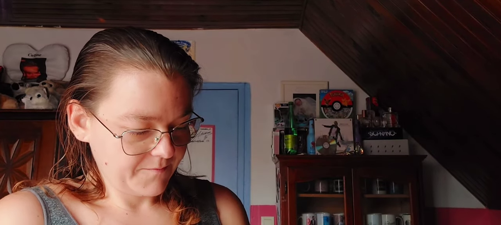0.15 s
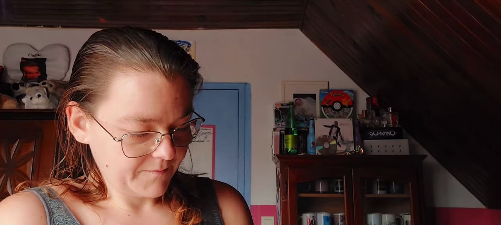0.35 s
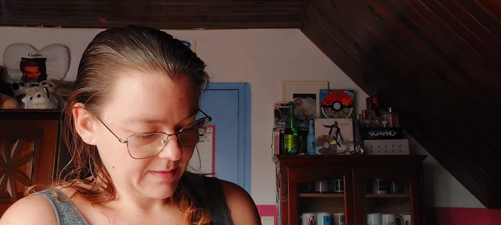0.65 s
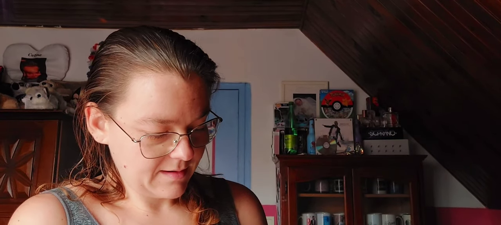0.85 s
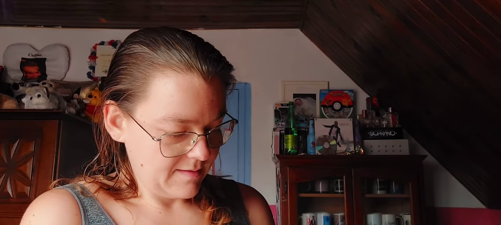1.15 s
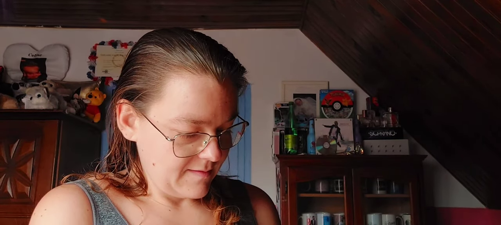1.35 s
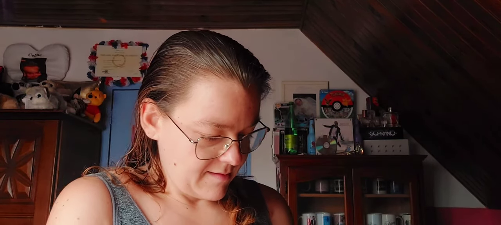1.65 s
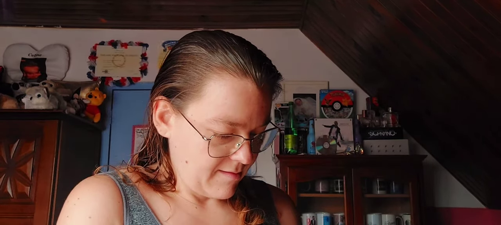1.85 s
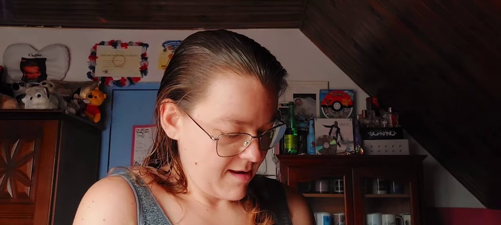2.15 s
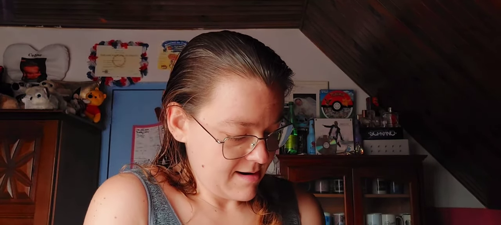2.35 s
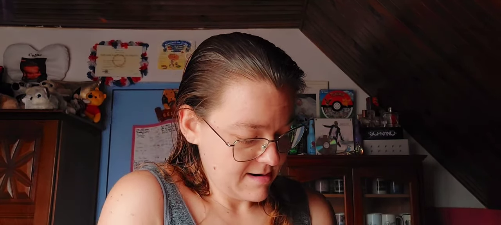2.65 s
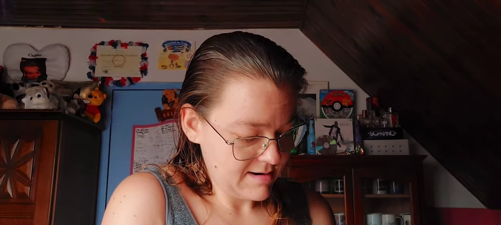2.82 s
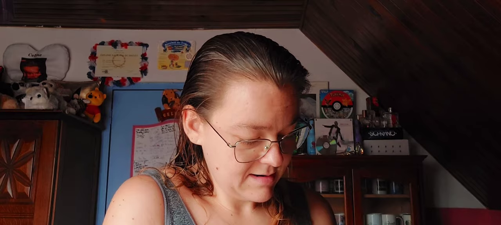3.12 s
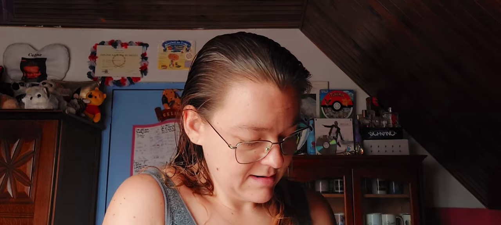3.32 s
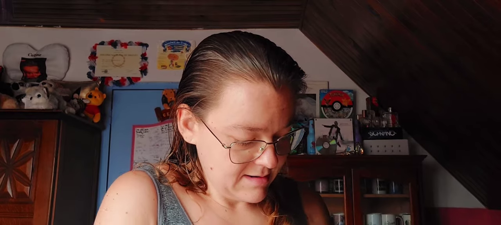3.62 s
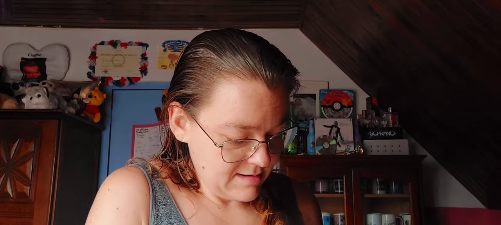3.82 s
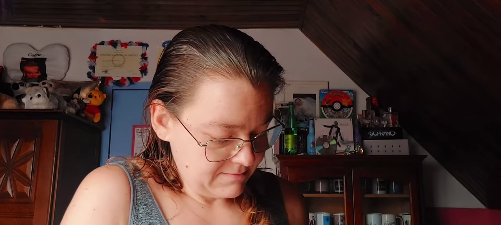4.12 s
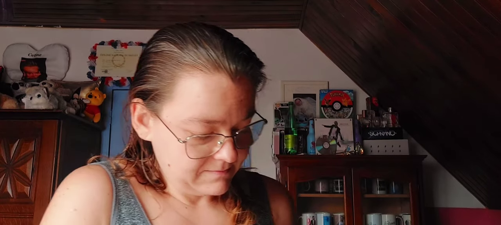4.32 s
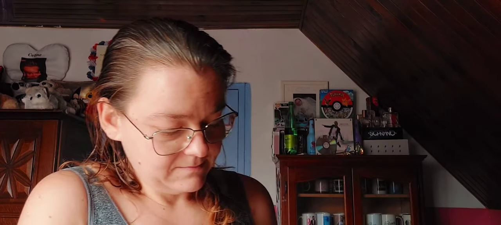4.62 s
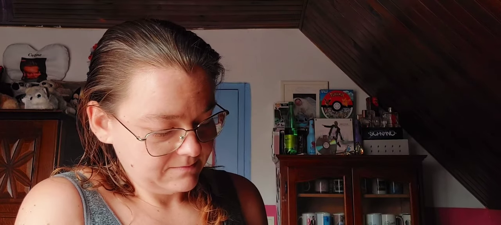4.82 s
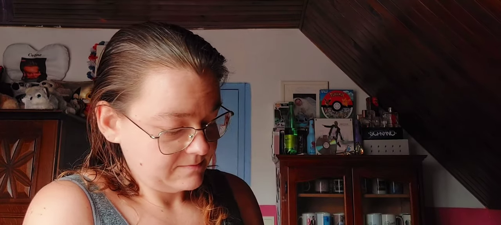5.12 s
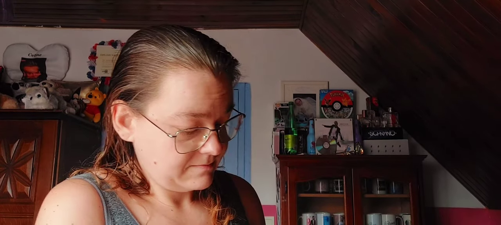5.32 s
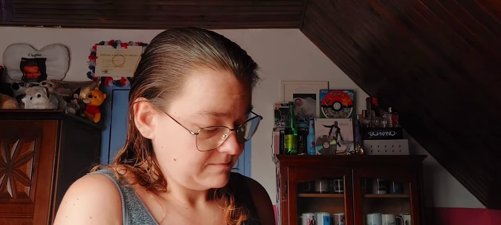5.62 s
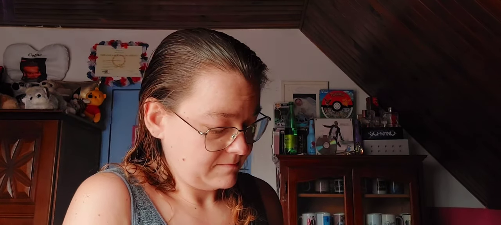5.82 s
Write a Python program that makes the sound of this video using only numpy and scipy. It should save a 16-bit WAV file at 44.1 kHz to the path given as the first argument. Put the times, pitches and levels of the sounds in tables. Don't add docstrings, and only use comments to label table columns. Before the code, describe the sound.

Hands unwrap stiff paper and plastic film close up indoors, rustling and crackling in bursts, with one very sharp loud crack past four seconds.

```python
import sys
import numpy as np
from scipy import signal
from scipy.fft import rfft, irfft, next_fast_len
from scipy.io import wavfile
from scipy.ndimage import map_coordinates

SR = 44100
rng = np.random.default_rng(int(sys.argv[2]) if len(sys.argv) > 2 else 0)


def digitize_waveform(pressure):
    field = np.atleast_2d(pressure).T
    bounded = np.clip(field, -1, 1)
    quanta = np.round(bounded * 32767).astype(np.int16)
    wavfile.write(sys.argv[1], SR, quanta)


def boost(x):
    u = np.asarray(x, float) / 20
    return 10 ** u


N = 263277

# frequency in Hz, density in dB per Hz.
HISS = [(18, -59), (30, -4), (88, 1), (624, -34), (1440, -22), (1870, -28.5), (2310, -16), (3420, -24.5),
        (15600, -19.5)]
# start in seconds, end in seconds, frequency in Hz, level in dB.
HUM = (1.57, 1.85, 436, -70)
# time in seconds, hold in seconds, paper rustle in dB, film crackle in dB.
SQUEEZES = [(0.1, .02, -68, -66), (0.293, 0.0075, -60, -74), (0.472, 0.12, -46, -50.5),
            (0.697, 0.013, -36, -43), (0.866, 0.089, -54.5, -69), (1.039, 0.013, -56, -56.5),
            (1.2, 0.03, -53.5, -59), (1.33, 0.0091, -45, -52), (1.43, 0.26, -52.5, -60.5),
            (1.845, 0.055, -53.5, -52), (2.052, 0.09, -53.5, -64.5), (2.204, 0.076, -52, -65),
            (2.444, 0.16, -49, -53.5), (2.624, 0.02, -62, -76), (2.776, 0.0059, -46, -45),
            (2.85, .08, -48, -54.5), (3.089, 0.017, -49, -56.5), (3.272, .01, -57.5, -61),
            (3.33, 0.077, -58, -61), (3.526, .01, -40.5, -50.5), (3.668, 0.087, -50, -54),
            (3.837, 0.0091, -47, -49.5), (4.114, .2, -51, -51.5), (4.394, 0.11, -44.5, -51.5),
            (4.57, .1, -54.5, -71), (4.728, 0.18, -50, -57), (4.986, 0.019, -55, -56),
            (5.213, 0.074, -48, -51.5), (5.603, 0.26, -75.5, -71)]
# time in seconds, rumble in dB.
PRESS = [(0.0, -72), (0.42, -76.5), (0.54, -48.5), (0.73, -66.5), (0.9, -69), (1.36, -62.5), (2.0, -67.5),
         (2.72, -73), (2.92, -50), (3.02, -78), (3.54, -56), (4.0, -72.5), (4.14, -56.5), (4.75, -58.5),
         (5.14, -70), (5.29, -49.5), (5.42, -74.5), (5.97, -75.5)]
# frequency in Hz, density in dB per Hz.
RUMBLE = [(25, -26.5), (60, -18), (127, 1.5), (180, -8.5), (240, -4), (350, -5.5), (480, -12.5), (700, -26)]
# frequency in Hz, width in Hz, level in dB.
PARCEL = [(625, 134, -2), (1100, 380, -1), (1450, 278, 1), (2337, 540, -1), (3270, 214, -14.5)]
# frequency in Hz, density in dB per Hz.
FILM = [(1500, -24), (3000, 3), (4000, -1), (6000, 0), (7600, -1.5), (9700, -7.5), (12300, -1.5),
        (15600, -7)]
# time in seconds, peak in dB, panel frequency in Hz.
CRIMPS = [(0.0082, -43, 2100), (0.1002, -45.5, 1100), (0.3074, -44, 1450), (0.4854, -25.5, 1510),
          (0.5325, -27, 2270), (5.5968, -49.5, 2310), (1.3292, -31, 1440), (1.3659, -32, 2290),
          (1.529, -39, 2150), (1.5962, -38.5, 2090), (2.0827, -38, 2570), (2.5364, -28, 2770),
          (2.5872, -28, 2600), (2.6422, -35, 1500), (2.8785, -31, 740), (2.9131, -30.5, 697),
          (3.4997, -32.5, 1310), (3.7155, -36, 1410), (3.832, -34, 1300), (4.1069, -16, 2160),
          (4.1108, -17, 2240), (4.1665, -28.5, 1450), (4.2333, -33, 860), (4.2663, -39.5, 1000),
          (4.758, -33.5, 2230), (4.8301, -32.5, 1310), (4.9709, -41.5, 2380), (5.073, -34.5, 2530),
          (5.2444, -30, 2560)]
# time in seconds, peak in dB.
FILM_TICKS = [(0.292, -47.5), (0.0767, -46), (0.2395, -44), (0.3805, -45.5), (0.412, -39.5), (0.5748, -27),
              (0.685, -39), (0.7225, -31.5), (1.15, -43), (1.206, -41), (1.868, -35.5), (1.91, -34),
              (1.944, -38), (1.99, -46), (2.156, -46), (2.3834, -41.5), (2.448, -44), (2.699, -47),
              (3.2763, -41.5), (3.4014, -38), (3.736, -35.5), (3.976, -43), (4.035, -39), (4.1335, -20),
              (4.378, -32), (4.5078, -38), (4.532, -39.5), (4.665, -42.5), (5.214, -31.5), (5.281, -35),
              (5.3225, -46),
    (5.468, -39.5),
    (5.5473, -72),
    (5.57, -44.5),
    (5.6871, -47),
    (5.7155, -47),
    (5.7393, -40.5),
    (5.8061, -46),
    (5.906, -57),
    (5.9533, -49),
]
# time in seconds, peak in dB, panel frequency in Hz.
FOLDS = [(0.4535, -36.5, 970), (0.48, -43.5, 1030), (0.8951, -32.5, 1006), (1.075, -35, 950),
         (1.615, -37, 1100), (2.74, -38, 1020), (1.6542, -38.5, 1100), (2.4831, -21.5, 2310),
         (2.5031, -32, 1470), (2.619, -37, 1670), (2.8224, -36.5, 1750), (2.893, -31, 1450),
         (2.9436, -29.5, 1140), (3.0292, -38.5, 1530), (3.1141, -26, 2780), (3.1251, -39.5, 2200),
         (3.4764, -29, 1350), (3.5445, -29.5, 960), (4.0064, -37.5, 1430), (4.131, -19, 1230),
         (4.1872, -31.5, 1617), (4.3023, -38, 1210), (4.3979, -32.5, 760), (4.4096, -30, 1430),
         (4.4208, -40, 2260), (4.4412, -30, 2270), (4.8654, -35.5, 1620), (5.2267, -25.5, 1470),
         (5.2865, -38, 2180)]
# time in seconds, peak in dB, panel frequency in Hz, tick in dB, left-right in dB.
SNAPS = [(0.4934, -21, 1085, -2.5, 0), (0.5838, -18.5, 2070, -8.5, -1), (0.6255, -25.5, 2160, -3.5, -1),
         (0.7622, -19, 2310, -6.5, -1), (1.0473, -24, 1520, -1.5, 3), (1.3152, -25.5, 1580, 3.5, 7.5),
         (1.8006, -26.5, 2460, -4, 2.5), (2.0268, -25, 1585, 3.5, 0), (2.0627, -23.5, 1760, -6, -2),
         (2.2251, -23, 2690, -7.5, 2.5), (2.488, -19, 1480, -14, 5.5), (2.7702, -20.5, 1620, -23, 8.5),
         (2.7853, -18, 1680, -2.5, 2), (2.9025, -19.5, 1060, -32.5, -4), (3.0671, -23.5, 1100, -14.5, 5),
         (3.5188, -14, 2050, -7, 2), (3.6366, -19.5, 1530, -10.5, 0.5), (3.861, -25.5, 1340, -4.5, 1.5),
         (4.0997, -10.5, 3030, -1.5, 3), (4.1245, -6, 1253, -13, 6), (4.134, -13.5, 1550, -17.5, 6),
         (4.358, -25, 1215, -9, 5.5), (4.8863, -19, 1990, -12, 0.5), (5.1876, -28, 1145, 0, 0.5)]
# time in seconds, peak in dB.
RATCHET = [
    (0.6886, -18),
    (.693, -18),
    (0.6961, -27),
    (0.7014, -19),
    (0.7079, -22),
    (0.711, -18.5),
    (0.718, -16.5),
    (0.7269, -16.5),
    (0.7311, -20.5),
]
# frequency in Hz, t60 in seconds.
ATTIC_DECAY = [(150, 0.31), (600, 0.2), (1500, 0.17), (4000, 0.17), (12000, 0.24)]
# frequency in Hz, level in dB.
WALLS = [(150, 14), (1500, -3.5), (4000, 0.5), (12000, -4.5)]
# time in seconds, peak in dB.
THUDS = [(0.521, -53), (0.619, -44), (1.052, -44.5), (1.326, -42.5), (1.611, -57), (1.804, -56),
         (2.496, -45), (2.62, -53), (2.794, -44), (2.895, -44), (3.07, -40.5), (3.515, -41), (3.633, -39),
         (3.856, -49), (4.094, -32), (4.116, -22.5), (4.225, -42), (4.354, -46), (5.219, -48)]
# frequency in Hz, level in dB, t60 in seconds.
TABLE_MODES = [(62, -22.5, 0.26), (124, -3.5, .09), (230, -4.5, 0.068), (319, -4.5, 0.053)]
# start in seconds, end in seconds, frequency in Hz, width in Hz, level in dB.
RUB = (2.04, 2.46, 680, 200, -60)

HISS_DB = -61.5
GRIP_DB_S, LET_GO_DB_S = 298, 149
REST_DB = (-74.5, -79)
LEAD_S = 0.005
RATCHET_HZ, RATCHET_TICK_DB = 1030, -22
FOLD_TICK_DB, CRIMP_TICK_DB = -12, -1.5
LEFT_DB, SCATTER_DB = 2.5, 3
RIGHT_LAG = 5
TOP_HZ = 15850


def unit(x):
    return x / np.sqrt(np.mean(x ** 2) + 1e-20)


def peak_one(x):
    return x / np.abs(x).max(axis=-1, keepdims=True)


def along(points, hz):
    f, value = np.transpose(points)
    return np.interp(np.log(hz + 1), np.log(f + 1), value)


def wobble(rate):
    knots = rng.standard_normal(int(N * rate / SR) + 4)
    return map_coordinates(knots, [np.arange(N) * rate / SR])


def fade(start, end):
    t = np.arange(N) / SR
    return np.clip(np.minimum(t - start, end - t) / 0.072, 0, 1)


def filtered(x, response):
    m = next_fast_len(x.shape[-1] + 4096)
    spectrum = rfft(x, m) * response(np.fft.rfftfreq(m, 1 / SR))
    return irfft(spectrum, m)[..., :x.shape[-1]]


def add(out, s, sound, pan_db=0):
    sides = boost(np.array([[pan_db / 2], [-pan_db / 2]]))
    out[:, round(s * SR):][:, :sound.shape[-1]] += sides * sound


def decay(t, t60):
    return boost(-60 * t / t60)


def hollow(f):
    small = (1j * f / (1j * f + 520)) ** 2
    total = 0
    for k, (center, width, db) in enumerate(PARCEL):
        mode = 1j * f * width / (center * center - f * f + 1j * f * width)
        total = total + (-1) ** k * boost(db) * mode
    return small * total


def film(f):
    return boost(along(FILM, f))


def hiss_and_hum():
    hiss = unit(filtered(rng.standard_normal((2, N)), lambda f: boost(along(HISS, f))))
    drone = filtered(hiss, lambda f: 1 / (1 + (f / 400) ** 4))
    breath = boost(5.4 * wobble(15) - 3.5)
    start, end, hz, db = HUM
    pipe = boost(db) * fade(start, end) * np.sin(2 * np.pi * hz * np.arange(N) / SR)
    return boost(HISS_DB - 2.5) * (drone + breath * (hiss - drone)) + pipe


def grains(per_second, spread_db, clump_db, life):
    slip_db = spread_db * np.minimum(rng.exponential(1, N), 4.2) + clump_db * wobble(35)
    slips = (rng.random(N) < per_second / SR) * boost(slip_db)
    puff = np.abs(signal.lfilter([1], [1, -np.exp(-1 / (life * SR))], slips))
    shared, own = rng.standard_normal(N), rng.standard_normal((2, N))
    return puff * (shared + 1.32 * own)


def effort():
    t = np.arange(0, N / SR + .01, .002)
    power = boost(np.array(REST_DB)[:, None]) ** 2
    for s, hold, *db in SQUEEZES:
        down_db = GRIP_DB_S * np.maximum(s - t, 0) + LET_GO_DB_S * np.maximum(t - s - hold, 0)
        power = power + boost(np.array(db)[:, None] - down_db) ** 2
    return [np.interp(np.arange(N) / SR, t, 10 * np.log10(p)) for p in power]


def handling():
    paper_db, film_db = effort()
    rustle = grains(700, spread_db=3.0, clump_db=3.0, life=0.0038)
    paper = unit(filtered(rustle, lambda f: hollow(f) / (1 + 0.99 * (f / 2900) ** 6)))
    crackle = unit(filtered(grains(1100, spread_db=3.5, clump_db=3.5, life=.0005), film))
    low = rng.standard_normal(N) + 0.95 * rng.standard_normal((2, N))
    rumble = unit(boost(3.5 * wobble(4.2)) * filtered(low, lambda f: boost(along(RUMBLE, f))))
    rumble_db = np.interp(np.arange(N) / SR, *np.transpose(PRESS)) + [[1.5], [-1.5]]
    return boost(paper_db + 0.5) * paper + boost(film_db + 2.0) * crackle + boost(rumble_db) * rumble


def all_creases():
    small = [(s, db, RATCHET_HZ, RATCHET_TICK_DB) for s, db in RATCHET]
    small += [(*row, FOLD_TICK_DB) for row in FOLDS]
    small += [(*row, CRIMP_TICK_DB) for row in CRIMPS]
    chances = rng.standard_normal(len(small))
    return SNAPS + [(*row, LEFT_DB + SCATTER_DB * chance) for row, chance in zip(small, chances)]


def creaking(starts, t):
    gaps = np.where(starts[:, None] > starts, starts[:, None] - starts, 1)
    rest = np.min(gaps, axis=1)[:, None, None]
    level_db = -4.5 - 25 * np.clip(rest / 0.086, 0, 1) + rng.normal(0, 1.8, rest.shape)
    return boost(level_db - 60 * np.abs(t) / 0.022)


def snaps():
    out, t = np.zeros((2, N + SR)), np.arange(SR // 20) / SR - LEAD_S
    after = np.maximum(t, 0)
    creases, lone = all_creases(), FILM_TICKS
    count = len(creases) + len(lone)
    noise = rng.standard_normal((count, 3, len(t)))
    strain = creaking(np.array([row[0] for row in creases + lone]), t)
    slow = boost(rng.normal(0, 1.0, (count, 1, 1)))
    give = 1 - np.exp(-after / 0.00042)
    tear = 1 - np.exp(-(after / 0.001) ** 2)

    def ports(unlike):
        return noise[:, :1] + unlike * noise[:, 1:]

    pitch = np.array([row[2] for row in creases] + [1500] * len(lone))[:, None, None]
    edge = np.array([1500] * len(creases) + [5000] * len(lone))[:, None, None]
    shine = rng.uniform(1800, 14000, (count, 1, 1))

    def near_panel(f):
        return hollow(f) / (1 + 0.3 * np.log(np.maximum(f, 1) / pitch) ** 2)

    def fold(f):
        return film(f) * f ** 2 / (f ** 2 + edge ** 2) * (1 + 0.35 * np.exp(-((f - shine) / 2200) ** 2))

    kick_shape = strain + give * decay(after, 0.023 * slow)
    tick_shape = strain + tear * (decay(after, 0.019 * slow) + 1.3 * decay(after, .004))
    kicks = peak_one(filtered(ports(1.0) * kick_shape, near_panel))
    ticks = peak_one(filtered(ports(2.5) * tick_shape, fold))
    for k, (s, db, hz, tick_db, pan_db) in enumerate(creases):
        panel = give * np.sin(2 * np.pi * hz * t) * decay(after, 0.013)
        add(out, s - LEAD_S, boost(db + 0.5) * (1.25 * panel + 0.8 * kicks[k]), pan_db - .7)
        add(out, s - LEAD_S - .0003, boost(db + tick_db + 3.5) * ticks[k], pan_db - 2.5)
    for k, (s, db) in enumerate(lone):
        add(out, s - LEAD_S - .0003, boost(db + 3) * ticks[len(creases) + k], rng.normal(-0.94, 8.2))
    return out[:, :N]


def attic(x):
    out, hop = np.zeros((2, N + SR)), SR // 4
    for start in range(0, N, hop):
        hz, t, z = signal.stft(rng.standard_normal((2, SR // 3)), SR, nperseg=256)
        tail = signal.istft(z * decay(t, along(ATTIC_DECAY, hz)[:, None]), SR, nperseg=256)[1]
        wet = signal.fftconvolve(x[:, start:start + hop], tail / np.linalg.norm(tail[0]), axes=1)
        out[:, start + 130:][:, :wet.shape[1]] += wet
    return filtered(out[:, :N], lambda f: boost(along(WALLS, f)))


def thuds():
    out, t = np.zeros((2, N + SR)), np.arange(SR // 4) / SR
    push = 1 - np.exp(-(t / 0.0093) ** 2)
    for s, db in THUDS:
        phases = rng.normal(0, 0.32, (len(TABLE_MODES), 1, 1)) * [[1], [-1]]
        ring = 0
        for (hz, level, t60), phase in zip(TABLE_MODES, phases):
            strength = boost(level + rng.normal(0, 0.8))
            ring = ring + strength * decay(t, t60) * np.sin(2 * np.pi * hz * t + phase)
        add(out, s, boost(db + 7.5) * push * ring)
    return out[:, :N]


def flap():
    start, end, hz, width, db = RUB
    slips = grains(2500, spread_db=1.5, clump_db=1.5, life=.002)
    wall = lambda f: (1j * f * width / (hz * hz - f * f + 1j * f * width)) ** 2
    return boost(db) * fade(start, end) * unit(filtered(slips, wall))


def scene():
    near = snaps()
    wrap = near + handling() + flap() + boost(-5) * attic(near)
    wrap[1] = np.roll(wrap[1], RIGHT_LAG)
    return wrap + thuds() + hiss_and_hum()


def roll_off(x):
    return signal.sosfilt(signal.butter(12, 16950, fs=SR, output="sos"), x)


def record(dry):
    held = dry / (1 + np.abs(dry / .95) ** 4) ** (1 / 4)
    band = filtered(held, lambda f: boost(np.where(f < TOP_HZ, 0, -27)))
    return roll_off(band)


dry = scene()
out = record(dry)
digitize_waveform(out)
```